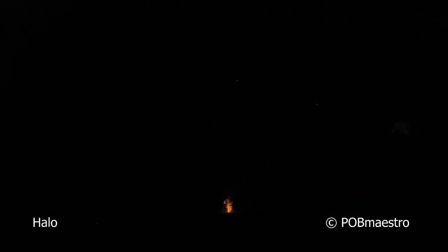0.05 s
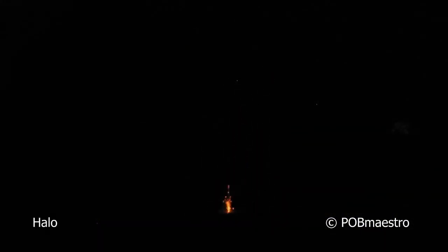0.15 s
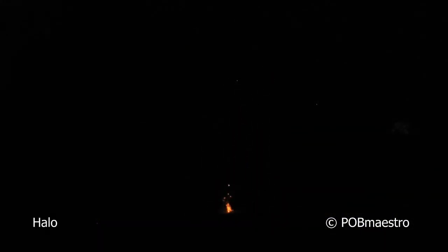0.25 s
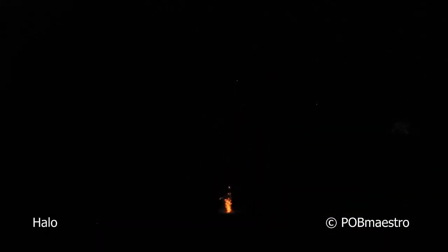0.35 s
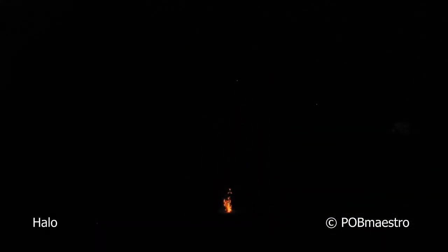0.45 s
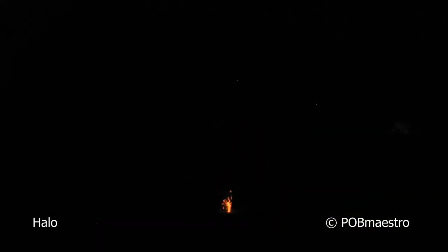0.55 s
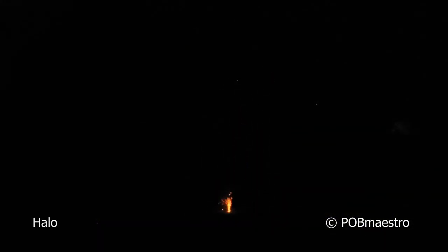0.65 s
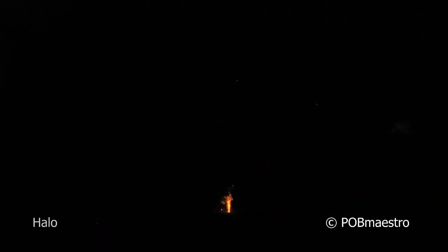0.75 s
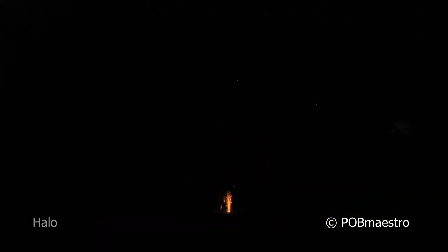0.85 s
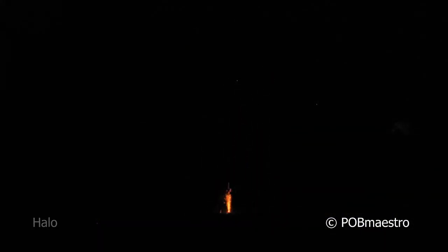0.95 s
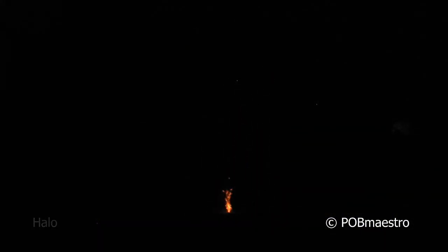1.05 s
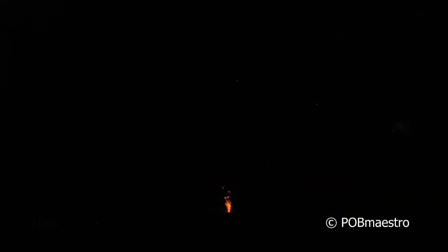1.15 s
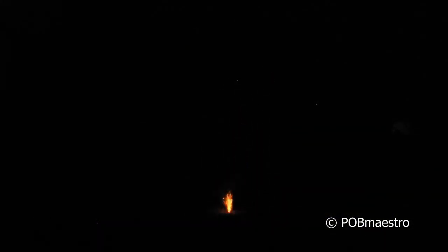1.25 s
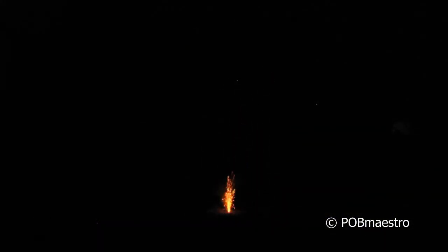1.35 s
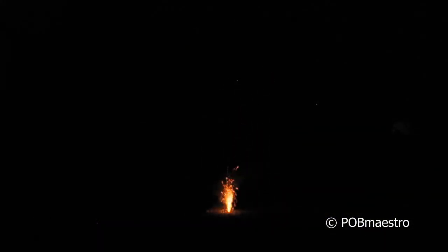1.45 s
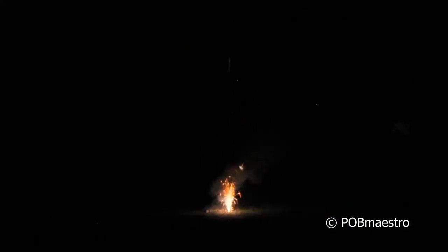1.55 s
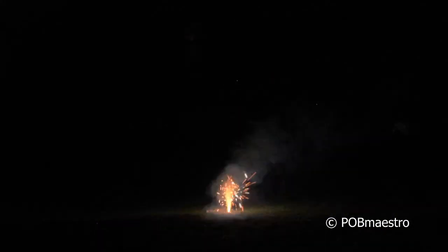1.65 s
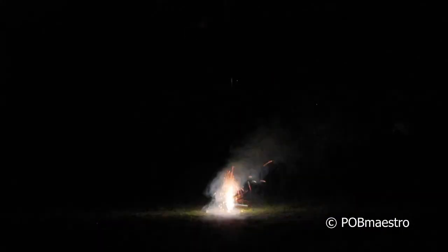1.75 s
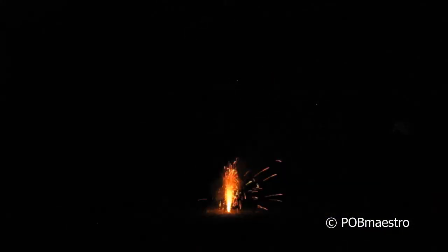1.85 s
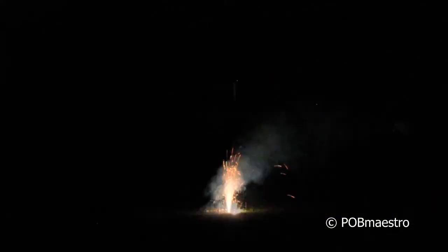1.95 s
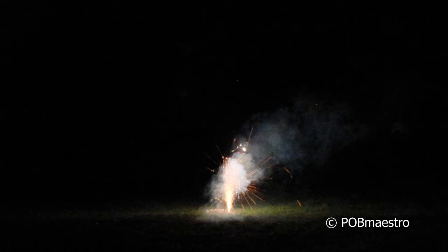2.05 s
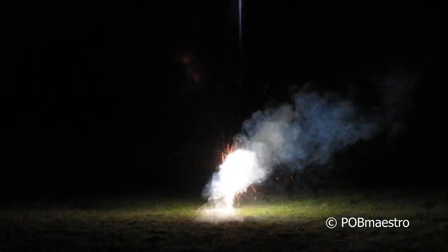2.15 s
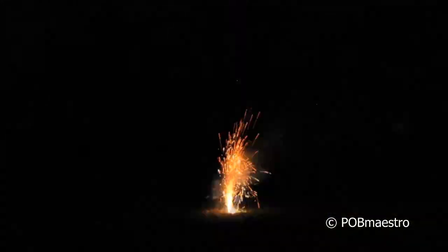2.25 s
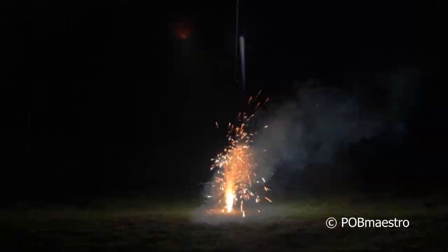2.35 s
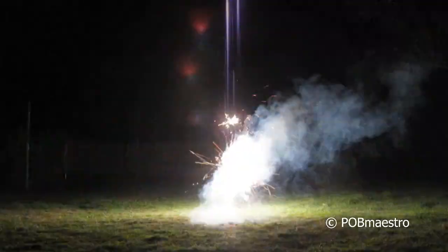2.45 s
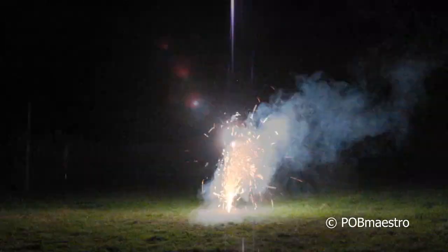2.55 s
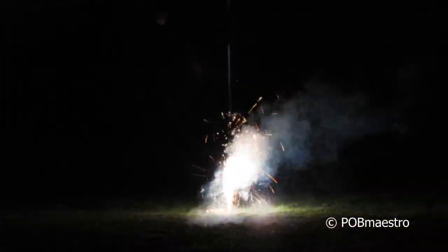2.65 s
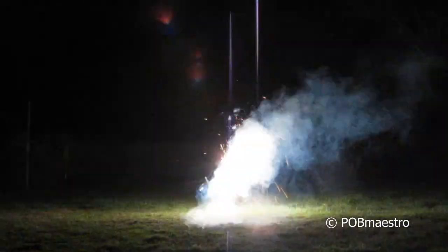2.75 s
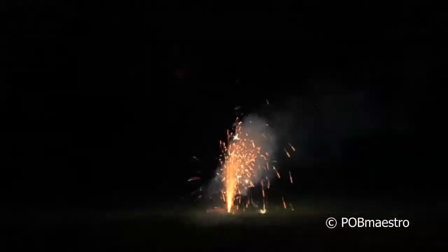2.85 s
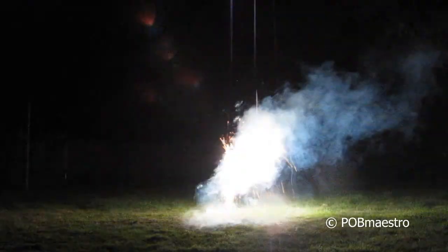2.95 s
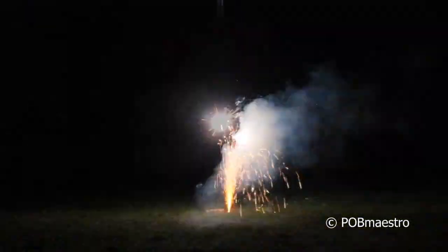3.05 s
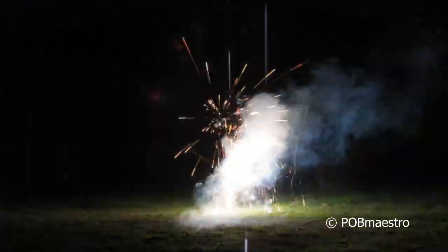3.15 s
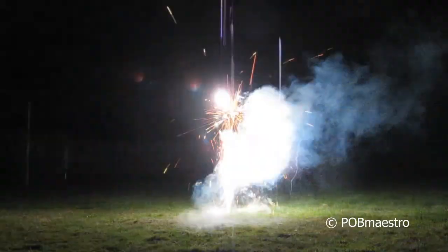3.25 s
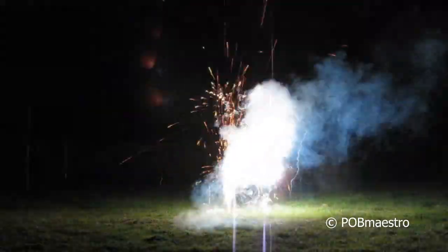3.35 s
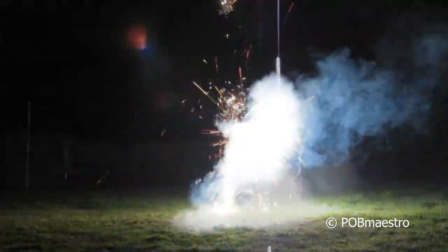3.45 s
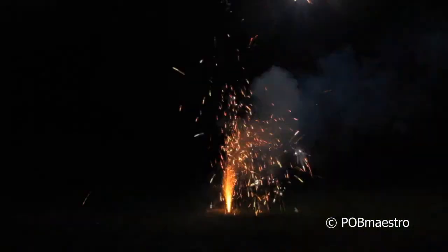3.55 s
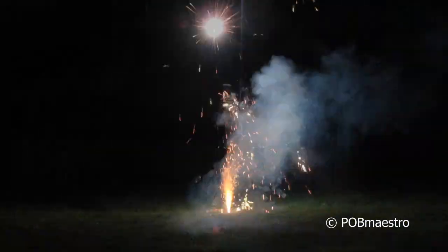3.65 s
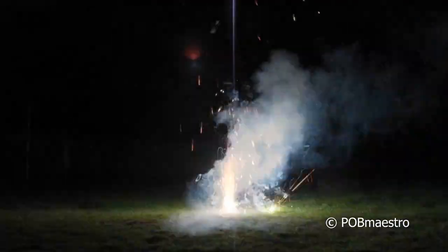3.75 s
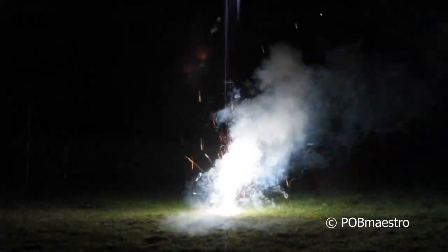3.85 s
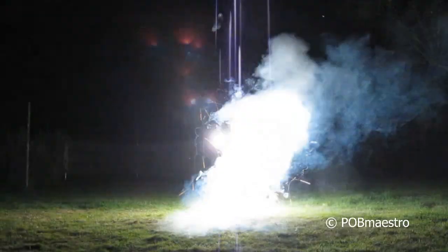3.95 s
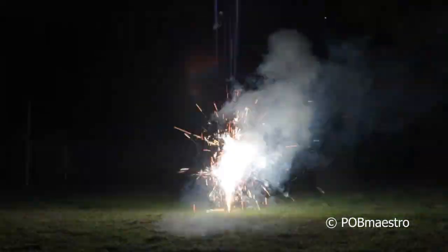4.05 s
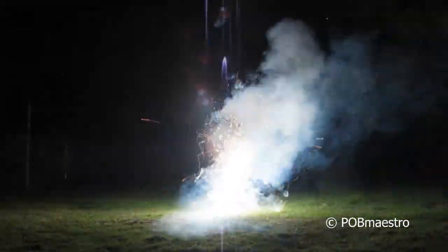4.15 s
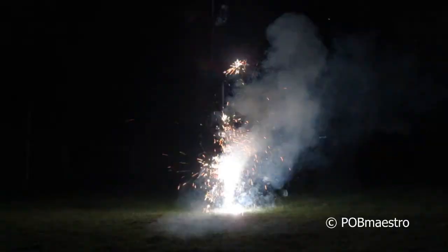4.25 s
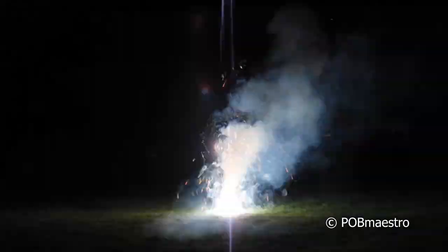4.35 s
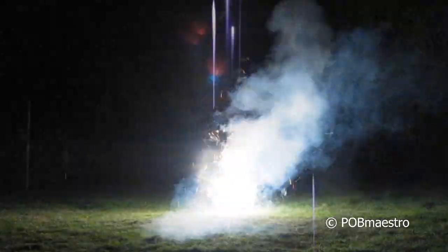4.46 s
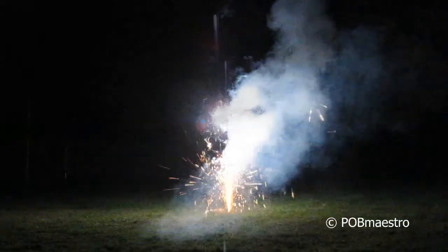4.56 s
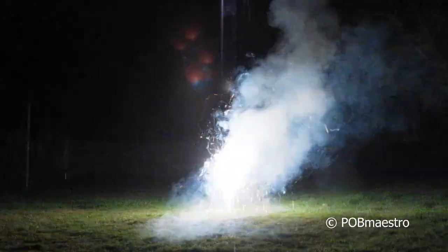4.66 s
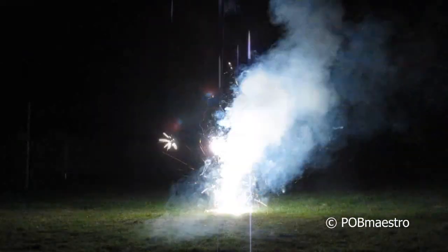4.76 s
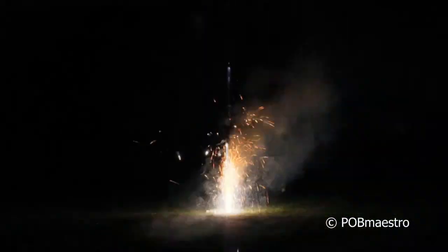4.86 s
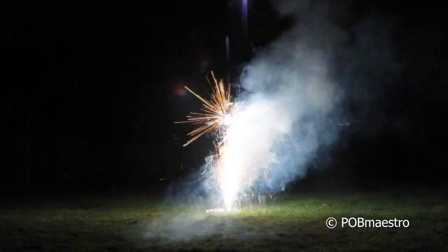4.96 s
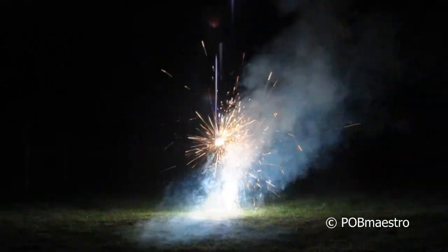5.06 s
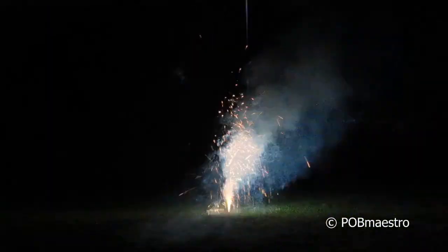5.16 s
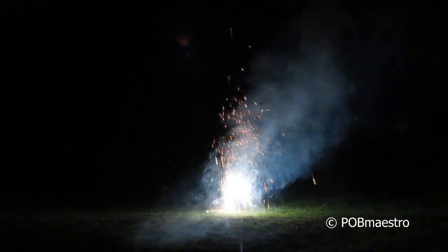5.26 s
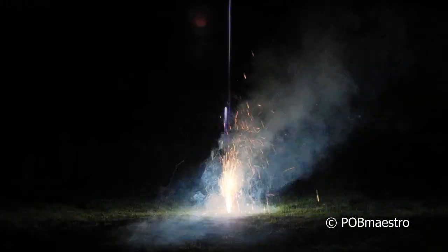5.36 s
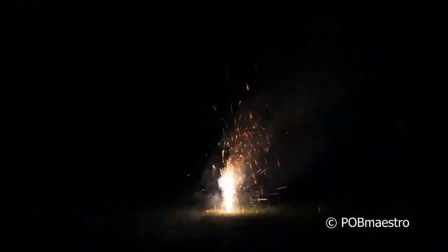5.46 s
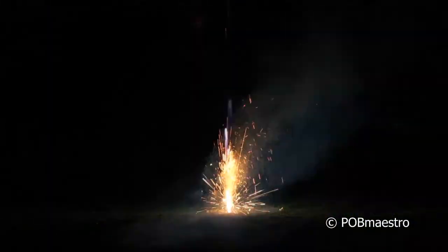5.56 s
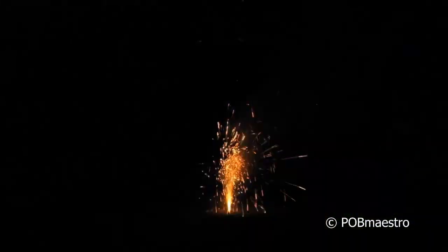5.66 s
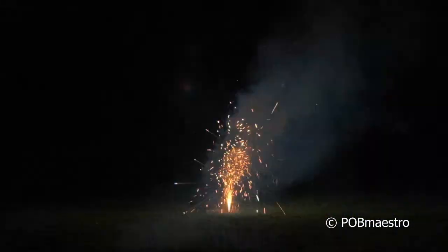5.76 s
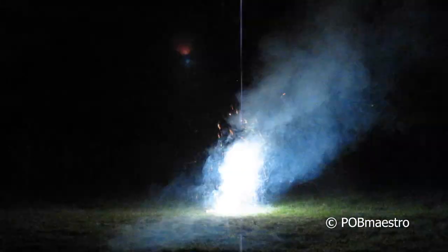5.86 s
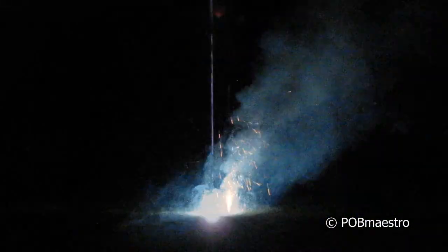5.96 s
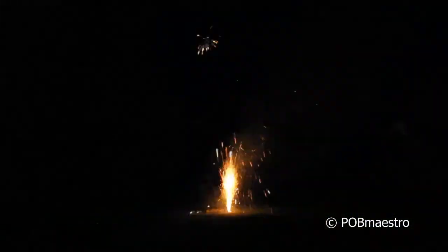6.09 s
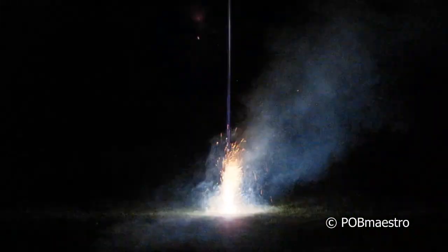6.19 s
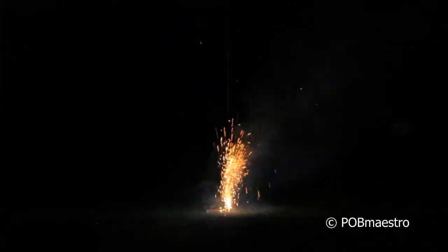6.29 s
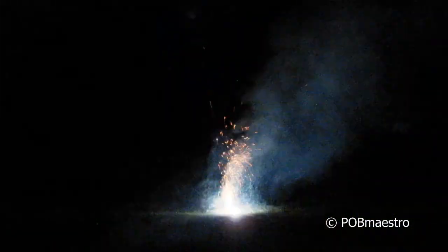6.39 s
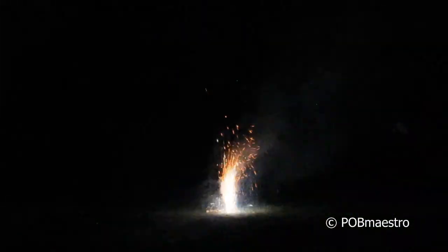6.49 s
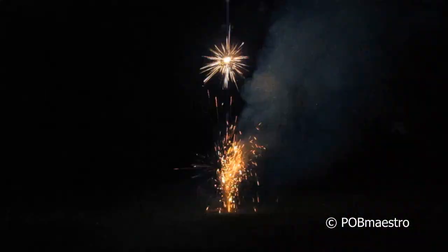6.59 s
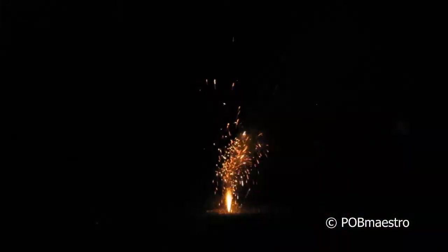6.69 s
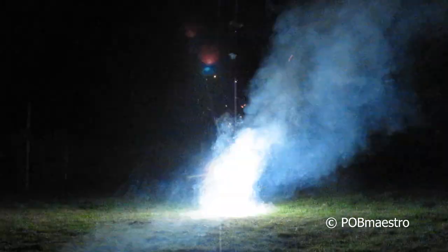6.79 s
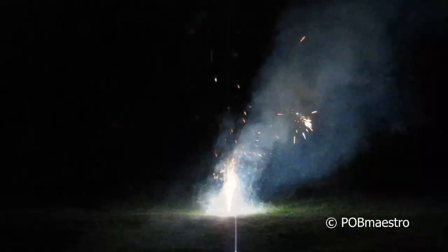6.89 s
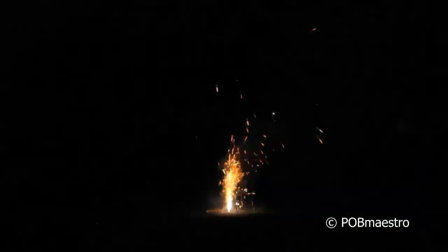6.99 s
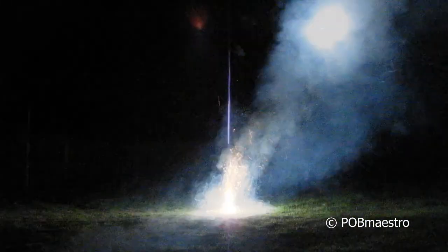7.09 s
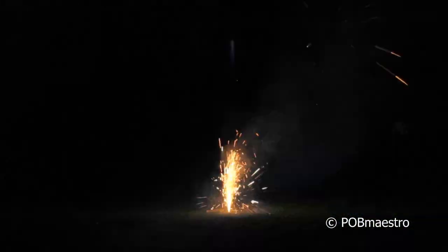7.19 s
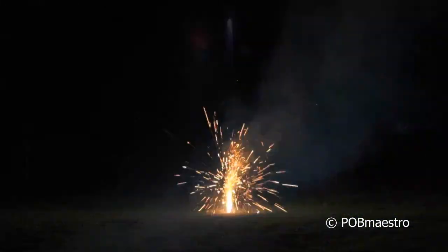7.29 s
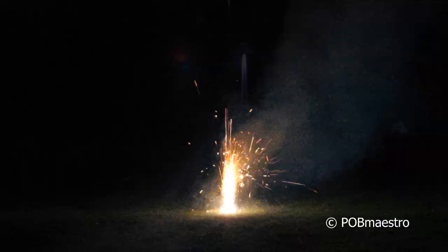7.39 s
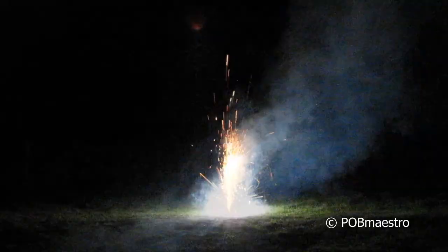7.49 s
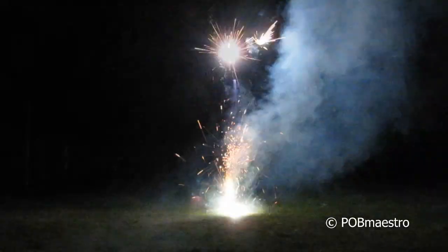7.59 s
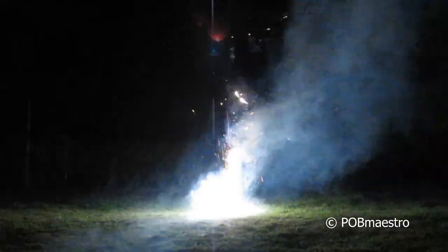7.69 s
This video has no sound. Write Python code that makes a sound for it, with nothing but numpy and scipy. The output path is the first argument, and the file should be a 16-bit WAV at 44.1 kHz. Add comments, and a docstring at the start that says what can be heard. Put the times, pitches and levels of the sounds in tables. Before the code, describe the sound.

Outdoors at night, a ground firework burns some metres from the microphone. From 0 to about 1.1 seconds its jet makes a bright, airy, sputtering hiss, slightly uneven, over soft low rumble of far traffic. At about 1.2 seconds the hiss chokes to a faint trace and the first weak ticks sound. From 1.6 seconds strong snaps arrive, with very hard cracks near 1.9, 2.1 and 2.2. Between 2.4 and 7.7 seconds dense irregular crackling continues, about twenty to thirty sharp dry cracks a second, varying in pitch and strength, slightly sparser around 6 to 6.6 and 6.8 to 7.2. Many carry short low thumps with a hollow knock, a wall slap ten milliseconds later, and a noisy echo swell fading within a few tenths. Tiny sparks tick in between. Heavy blasts near 2.46, 3.6, 3.8, 5.1 and 7.5 jam the microphone, momentarily muting and distorting it. Crackling is still going at the end.

```python
"""Crackling fountain firework

A ground fountain burns at night some metres from a microphone: first its jet hisses as coloured noise,
then stars burst as short shock fronts with low thumps, answered by a wall and a swell of noise echoes.
Random sparks tick after each star. After some blasts the preamp jams on its rail, mostly for some
milliseconds; steady noise of slowly changing level makes the rumble of far traffic."""
import sys
import numpy as np
from scipy import signal
from scipy.fft import rfft, irfft, next_fast_len
from scipy.io import wavfile
from scipy.ndimage import uniform_filter1d, map_coordinates

SR = 44100
rng = np.random.default_rng(int(sys.argv[2]) if len(sys.argv) > 2 else 0)


def volts_from_db(level):
    """Convert decibel levels to linear amplitude ratios."""
    exponent = np.asarray(level, float) / 20
    return 10 ** exponent


def unload_audio(sound):
    """Save the sound as a 16-bit wav file, at the path given as the first command line argument."""
    columns = np.transpose(np.atleast_2d(sound))
    # keep every value between -1 and 1, then stretch to whole-number steps
    steps = np.round(np.clip(columns, -1, 1) * 32767)
    wavfile.write(sys.argv[1], SR, steps.astype(np.int16))


N = 340893

# Star bursts, with levels and pitch as nominal values that the parts below offset.
# Each row: start in seconds, snap level in dB, snap pitch in Hz, thump level in dB, echo level in dB.
BURSTS = [(1.1952, -26, 7800, -54, -70), (1.3987, -26, 8040, -44, -47), (1.5563, -18.5, 8060, -44, -52),
          (1.5947, -12, 8150, -50, -43), (1.6382, 1, 5000, -21.5, -31), (1.6676, -15, 8400, -48, -42.5),
          (1.6975, -6.5, 5980, -23.5, -34), (1.7003, -2.5, 7800, -34, -36), (1.7473, 1, 5800, -22, -30.5),
          (1.7506, -3, 5460, -25, -38), (1.867, -10.5, 4760, -26, -38), (1.8874, 5, 6000, -12, -20.5),
          (1.914, -7, 6600, -45, -28), (2.004, -8.5, 6020, -50, -35), (2.065, 11, 8000, -18, -23),
          (2.0995, 4, 7600, -9.5, -12.5), (2.186, 13, 3850, -21, -21.5), (2.2146, 4, 8200, -29, -45),
          (2.2657, -1.5, 7140, -22, -26.5), (2.4, -4, 7100, -21.5, -28.5), (2.4335, 4.5, 8140, -30, -24.5),
          (2.4622, -7, 7140, -36, -15.5), (2.4635, -1, 4830, -12, -46), (2.539, 1, 6700, -20, -22),
          (2.556, 3, 5860, -28, -40), (2.5794, -4.5, 5070, -43, -28.5), (2.6555, -11.5, 5060, -49, -33),
          (2.7111, -6.5, 4740, -21, -29), (2.7325, -10, 6580, -33, -38), (2.7882, -14.5, 4080, -19.5, -40),
          (2.813, -5, 5800, -22, -28.5), (2.85, -2, 7250, -17, -18.5), (2.903, -4, 7360, -25, -32),
          (2.9077, 0.5, 7000, -29, -25.5), (3.0158, -3.5, 6400, -20.5, -21),
          (3.0861, -0.5, 7700, -18, -22.5), (3.1064, -1, 6940, -18, -14.5), (3.1165, 1, 8490, -16, -28),
          (3.137, -6.3, 7560, -26, -25), (3.2246, -10, 6200, -38, -29), (3.2382, 1, 6700, -15.5, -16.5),
          (3.2677, -3, 6400, -22.5, -26), (3.3552, -1.5, 4380, -54, -26.5), (3.366, -2, 6900, -25.5, -40),
          (3.3713, -5, 3730, -31, -29.5), (3.4005, -0.5, 8000, -15, -24), (3.4339, -4, 6790, -36, -24),
          (3.4636, -2, 6300, -16, -20.5), (3.525, -1.5, 7000, -29, -30), (3.5681, -4, 7640, -17, -17.5),
          (3.599, -15, 5010, -17, -22.5), (3.612, 4, 4930, -20, -20), (3.6295, -0.5, 6200, -37, -31),
          (3.7156, -7.5, 5510, -38, -28.5), (3.7981, -1.5, 6000, -12, -14.5), (3.8137, 3, 4170, -17, -21.5),
          (3.82, -7, 4130, -11.5, -20), (3.842, -14, 5700, -24, -19), (3.8701, -6, 7180, -14.5, -23),
          (3.9431, -3, 6540, -19.5, -25), (3.9536, -3, 8000, -34, -53), (3.979, -5.5, 7160, -23.5, -28),
          (4.0358, -2, 7300, -25, -26), (4.1283, -1.5, 5400, -27.5, -29), (4.1536, -1, 5100, -16, -17),
          (4.1819, -3, 4000, -36, -30.5), (4.2692, -6.5, 3700, -36, -22), (4.2768, 15, 6900, -17, -17),
          (4.2907, -1, 4110, -18.5, -23), (4.306, -2, 3590, -22.5, -38), (4.3941, -10, 3830, -41, -27),
          (4.4165, -16, 8400, -48, -42), (4.4493, 1, 7000, -15.5, -17), (4.5442, -0.5, 7000, -24.5, -30),
          (4.5589, -7.5, 4200, -22.5, -40), (4.5955, -1, 4930, -23, -25.5), (4.6618, 2, 7200, -25, -20),
          (4.6676, -1.5, 4220, -23.5, -48), (4.6903, -9, 7240, -41, -33), (4.7786, -8.5, 4520, -38, -33),
          (4.8255, -7.5, 7460, -25.5, -35), (4.8578, 1.5, 7490, -33, -29), (4.8598, -2.5, 6360, -22.5, -25),
          (4.8873, -5, 6290, -43, -38), (4.8942, -11, 7190, -23, -36), (4.9757, 0.5, 7350, -17.5, -23),
          (4.9989, 2, 7800, -17.5, -19.5), (5.0111, -4.5, 4910, -26, -36), (5.073, -1.5, 4160, -25, -23),
          (5.0822, 0, 7100, -32, -29), (5.0962, -5, 6720, -18, -17.5), (5.1255, -6, 4340, -40, -39),
          (5.1623, 7, 7300, -29, -19.5), (5.1705, -1, 6460, -20, -18.5), (5.1762, 4, 4630, -23, -31),
          (5.2292, 8, 6100, -21, -18), (5.2574, -7, 6200, -33, -28), (5.3194, -7.5, 5040, -22.5, -28),
          (5.3409, 9, 7260, -22.5, -19), (5.37, -3.5, 5400, -35, -34), (5.3994, -4, 7260, -18.5, -29),
          (5.4562, -11.5, 3940, -46, -31.5), (5.4814, -5.5, 7700, -19.5, -32),
          (5.504, 1, 7150, -21.5, -21.5), (5.5141, -5, 8400, -41, -25), (5.5278, 2, 6800, -28, -19.5),
          (5.5447, -3, 5380, -25, -26), (5.557, -5, 4050, -29, -38), (5.5894, -4, 8160, -20, -26),
          (5.646, -10.5, 4080, -28.5, -29), (5.6697, -2, 7100, -16.5, -22.5), (5.7179, 1, 6400, -22, -19),
          (5.728, -3, 7400, -36, -52), (5.7387, -4, 3150, -45, -45), (5.835, -19, 5960, -51, -20.5),
          (5.8431, 5, 6000, -13.5, -15), (5.8783, -6, 5370, -32, -42), (5.9557, -8, 3700, -21.5, -25),
          (5.9598, 0, 4500, -43, -43), (6.1004, -8.5, 7300, -20.5, -32), (6.1548, -3, 8160, -17, -28.5),
          (6.2582, -8, 7400, -22, -33.5), (6.2841, 0, 7450, -19, -27.5), (6.3561, -11, 6300, -24.5, -37),
          (6.4009, -22, 6510, -52, -47), (6.4869, 1, 8400, -18.5, -28), (6.5864, 2, 8700, -16, -26.5),
          (6.589, -5.5, 8100, -18, -30), (6.6689, -1, 6300, -17, -17), (6.698, 1, 4300, -21, -24),
          (6.7089, 1, 5670, -25, -25.5), (6.7649, -3, 6200, -14, -16.5), (6.8812, -10.5, 5200, -36, -31),
          (7.0173, -3, 5600, -16, -25), (7.056, -2.5, 6000, -19.5, -21), (7.1722, -13.5, 6500, -43, -38),
          (7.241, 5, 7530, -22, -23), (7.2421, -1, 4900, -25, -25.5), (7.2966, 0.5, 5950, -24.5, -26.5),
          (7.3677, 3, 3720, -17.5, -26), (7.374, -1, 3420, -27, -19.5), (7.3833, -2, 6150, -15, -18.5),
          (7.4126, -5, 5900, -28, -44), (7.4226, -5, 6870, -35, -44), (7.4842, -7, 4420, -48, -22.5),
          (7.4902, -1, 7350, -15, -22), (7.501, -2, 5060, -13.5, -18.5), (7.5301, -1, 5060, -23, -25),
          (7.6175, 3, 6000, -17, -24.5), (7.675, 3, 6300, -18, -22), (7.6912, -2, 6180, -11.5, -40),
          (7.7034, 0, 6400, -15.5, -15)]
# Spectrum of the bright part of the echoes. Each row: frequency in Hz, relative level in dB.
BRIGHT_ECHO_COLOUR = [(2500, -30), (4200, -5), (5500, -2.5), (8200, 4), (10000, -2.5), (12000, -12),
                      (16000, -17.5), (20000, -50)]
# Spectrum of the middle part of the echoes. Each row: frequency in Hz, relative level in dB.
MID_ECHO_COLOUR = [(700, -15.5), (1500, -5.5), (2500, -2), (3500, 0), (4500, -3.5), (6500, -10),
                   (10000, -46)]
TILT_DB_PER_OCTAVE, EVEN_HZ = 5.5, 6000  # higher snaps throw brighter echoes with less middle
BRIGHT_ECHO_DB, MID_ECHO_DB = -5.5, -9.5  # offsets from the listed echo level
MID_GROWS, EVEN_DB = 0.18, -23  # stronger bursts carry more middle: dB per dB of echo over the even one


def stars():
    """Superposition: each burst sums a snap, a thump and the bright and middle parts of its echoes."""
    s, snap_db, hz, thump_db, echo_db = np.transpose(BURSTS)
    cycles = 0.34 + 0.37 * (hz[:, None] / 8000) ** 3  # higher fronts last more cycles
    port_ring = 0.33 * rng.random(len(s))
    fronts = snaps(hz * 1.002, cycles, port_ring)
    snap = place(s, volts_from_db(snap_db + 2.5)[:, None] * fronts)

    tilt_db = TILT_DB_PER_OCTAVE * np.log2(hz / EVEN_HZ)
    bright_db = echo_db + tilt_db + BRIGHT_ECHO_DB
    mid_db = echo_db - tilt_db + MID_ECHO_DB + MID_GROWS * (echo_db - EVEN_DB)
    bright = echoes(s, bright_db, answer(), BRIGHT_ECHO_COLOUR, count=7, fade_db=0.01, grain_db=4.2)
    mid = echoes(s, mid_db, answer(), MID_ECHO_COLOUR, count=6, grain_db=5.2)
    return rounded(snap) + thumps(s, thump_db) + bright + mid


def snaps(hz, cycles, ring):
    """Impulsive radiation: shock fronts, falling first, excite the damped resonance of the microphone port."""
    t = np.arange(SR // 200) / SR - 1 / (8 * hz[:, None])
    front = -np.cos(2 * np.pi * hz[:, None] * t) * np.exp(-hz[:, None] * np.abs(t) / cycles)
    port = np.sin(2 * np.pi * 8300 * t) * np.exp(-np.abs(t) / .0004) * (t > 0)
    return front + ring[:, None] * port


def rounded(x):
    """Band-pass filtering: the fronts lose their top above about 10 kHz; their bass is in the thump."""
    return signal.sosfilt(signal.butter(N=2, Wn=[1500, 10500], btype="band", fs=SR, output="sos"), x)


# Modes of something hollow nearby, struck by each thump.
# Each row: frequency in Hz, level relative to the thump in dB, 60 dB decay time in seconds.
HOLLOW = [(382.7, -20.5, 0.22), (641, -35, 0.17), (888, -31, 0.25)]
# Outline of the low echoes, before any added fade. Each row: delay in milliseconds, relative level in dB.
LOW_ECHO = [(1, -5), (9.5, -7), (11.5, -2.5), (25, -3), (32, -4), (60, -14), (150, -26), (400, -27)]
# Spectrum of the dull tail. Each row: frequency in Hz, relative level in dB.
BOOM_COLOUR = [(30, -8), (150, -2.5), (350, -1.5), (600, -11), (1500, -45)]
# Spectrum of the knock. Each row: frequency in Hz, relative level in dB.
KNOCK_COLOUR = [(250, -50), (550, 8.5), (1100, -0.5), (2500, -41)]


def thumps(s, db):
    """Impulse and modal response: a low push, a hollow ring, a dull tail and a knock that dies sooner."""
    u = np.arange(SR // 200) / SR / 0.00045  # time in units of 0.45 ms
    pulse = (u - 1.3) * np.exp(-u) * (1 - np.exp(-(u / 0.37) ** 2)) * 4  # a pull, then a weaker push
    push = place(s, volts_from_db(db)[:, None] * pulse)

    t = np.arange(SR // 4) / SR
    modes = sum(volts_from_db(level - 60 * t / t60) * np.sin(2 * np.pi * hz * t) for hz, level, t60 in HOLLOW)
    strikes = place(s, volts_from_db(db)[:, None])
    ring = signal.fftconvolve(strikes, modes)[:N]

    tail = echoes(s, db - 17, LOW_ECHO, BOOM_COLOUR, count=3)
    knock = echoes(s, db - 13.0, LOW_ECHO, KNOCK_COLOUR, count=3, fade_db=0.46)
    return off_wall(push, -5.5) + ring + tail + knock


WALL_MS = 10.5  # extra delay by way of the nearest wall


def off_wall(x, db):
    """Specular reflection: a sound and its delayed copy off the nearest wall."""
    return x + volts_from_db(db) * np.pad(x, (round(WALL_MS * SR / 1000), 0))[:N]


def echoes(s, level_db, shape, colour, count, fade_db=0, grain_db=0):
    """Convolution: bursts take turns among scattered answers of one outline, as from different places."""
    ms, db = np.transpose(shape)
    t = np.arange(int(.4 * SR)) / SR * 1000  # ms
    outline = volts_from_db(np.interp(t, ms, db, left=-99) - fade_db * t)  # fade in dB per ms
    which = np.arange(len(s)) % count
    total = 0
    for k in range(count):
        blows = place(s[which == k], volts_from_db(level_db[which == k])[:, None])
        response = outline * aired(noise(colour, len(t), grain_db), t)
        total = total + signal.fftconvolve(blows, response)[:N]
    return total


GROUND_DB, GROUND_DB_PER_MS, GAP_DB = 9.5, 6, -17.5  # ground nearby answers at once, then near silence
SLAP_DB, SLAP_DB_PER_MS = 10, 16.5  # the wall's slap
SWELL_DB, SWELL_MS, SWELL_RISE_MS, SWELL_FALL_MS = -0.5, 21.2, 2.9, 9.6  # a crowd of scattered echoes
TAIL_DB, TAIL_DB_PER_MS, TAIL_BEND_MS = -6, 0.095, 310  # the far tail, falling away faster near the bend


def answer():
    """Energy addition: ground, gap, slap, swell and tail add in power to an outline of (ms, dB) rows."""
    ms = np.arange(1, 400, .1)
    late = np.maximum(ms - WALL_MS, 0)
    ground = volts_from_db(GROUND_DB - GROUND_DB_PER_MS * ms) ** 2
    gap = volts_from_db(GAP_DB) ** 2 * (late == 0)
    slap = volts_from_db(SLAP_DB - SLAP_DB_PER_MS * late) ** 2
    swell_width = np.where(ms < SWELL_MS, SWELL_RISE_MS, SWELL_FALL_MS)
    swell = volts_from_db(SWELL_DB) ** 2 * np.exp(-((ms - SWELL_MS) / swell_width) ** 2)
    tail = volts_from_db(TAIL_DB - TAIL_DB_PER_MS * late - 8.8 * (ms / TAIL_BEND_MS) ** 6) ** 2
    power = ground + gap + (slap + swell + tail) * (late > 0)
    return np.transpose([ms, 10 * np.log10(power)])


AIR_HZ, AIR_DB_PER_MS = 10300, 0.09  # the longer the path, the more air takes from the top


def aired(tail, ms):
    """Atmospheric absorption: the top of an echo tail dies faster than its body."""
    body = signal.sosfiltfilt(signal.butter(N=4, Wn=AIR_HZ, fs=SR, output="sos"), tail)
    return body + (tail - body) * volts_from_db(-AIR_DB_PER_MS * ms)


SPARK_LAG_S, SPARK_DB_PER_S = 0.05, 80  # scale of the random delay, weakening with delay


def sparks(count):
    """Random point process: each burst scatters small sparks that tick at random soon after it."""
    s, *_, echo_db = np.transpose(BURSTS)
    luck = rng.random((len(s), count, 4))  # delay, size, pitch, port ring
    lag = WALL_MS / 1000 - SPARK_LAG_S * np.log(luck[..., 0] + .01)
    size_db = echo_db[:, None] - SPARK_DB_PER_S * lag - 2.9 * np.log(luck[..., 1] + 0.002)
    ticks = snaps(2200 + 5000 * luck[..., 2].ravel(), 1.0, 0.14 * luck[..., 3].ravel())
    starts = (s[:, None] + lag).ravel()
    return rounded(place(starts, volts_from_db(size_db.ravel())[:, None] * ticks))


# The jet's mean level: strong until it chokes near 1.2 s, sinking with a brief recovery to a faint hiss,
# slightly up at the end. Each row: time in seconds, level in dB.
JET = [(0, -44.5), (.07, -41.5), (.25, -44), (.43, -39.5), (.69, -41), (.87, -38.5), (1.122, -42),
       (1.16, -49), (1.3, -57.5), (1.55, -52.5), (2.4, -61), (4.0, -80), (7.73, -70)]
# Spectrum of the roar. Each row: frequency in Hz, relative level in dB per Hz.
JET_COLOUR = [(1350, -52), (2300, -31), (3340, -14.5), (3960, -21), (4970, -10), (6450, -10.5),
              (7460, -3.5), (11300, -17), (15000, -40), (16000, -29)]
# Spectrum of the fizz on top. Each row: frequency in Hz, relative level in dB per Hz.
FIZZ_COLOUR = [(8000, -22), (10500, 2), (14000, -6), (17000, 1)]


def jet():
    """Turbulent jet noise: burning gas roars and sputters; the harder it blows, the more it fizzes on top."""
    level_db = curve(JET)
    roar_db = level_db + 1.17 * wobble(29.9) + 0.63 * wobble(250)
    fizz_db = -58.5 + 2.3 * (level_db + 44) + 1.6 * wobble(9.2)
    return volts_from_db(roar_db) * noise(JET_COLOUR, N) + volts_from_db(fizz_db) * noise(FIZZ_COLOUR, N)


# The rumble's mean level: nearly steady, up a little near 1.8 s, low by 2.5 s, then slowly rising.
# Each row: time in seconds, level in dB.
TRAFFIC = [(0, -41.5), (1.55, -42.5), (1.8, -40), (2.05, -48), (2.5, -56.5), (7.73, -49)]
# Spectrum of the traffic. Each row: frequency in Hz, relative level in dB per Hz.
TRAFFIC_COLOUR = [(20, -3.5), (60, -8), (110, -12.5), (250, -19), (500, -27), (1100, -26.5), (2300, -36.5),
                  (16000, -45)]


def traffic():
    """Incoherent background: the far rumble of the night as low-weighted noise of wavering level."""
    return volts_from_db(curve(TRAFFIC) + 0.29 * wobble(3.42)) * noise(TRAFFIC_COLOUR, N)


def unit(x):
    """Normalisation: scales a signal to rms 1."""
    return x / np.sqrt(np.mean(x ** 2) + 1e-20)


def curve(rows):
    """Linear interpolation: (s, value) rows become one value per sample."""
    s, v = np.transpose(rows)
    return np.interp(np.arange(N) / SR, s, v)


def wobble(rate):
    """Slow random modulation: a smooth curve through rate random knots a second."""
    knots = rng.standard_normal(int(N * rate / SR) + 4)
    return map_coordinates(knots, [np.arange(N) * rate / SR])


def noise(spectrum, size, grain_db=0):
    """Spectral shaping: noise of rms 1 coloured by (Hz, dB) points; grain makes some instants stand out."""
    m = next_fast_len(size)
    f, db = np.transpose(spectrum)
    bins = np.fft.rfftfreq(m, 1 / SR)
    gain = volts_from_db(np.interp(np.log(bins + 1), np.log(f + 1), db))
    lumps = volts_from_db(grain_db * unit(uniform_filter1d(rng.standard_normal(m), size=7)))
    white = rng.standard_normal(m) * lumps
    return unit(irfft(rfft(white) * gain, m)[:size])


def place(s, waves):
    """Linear superposition: sums rows of short waves at their start times."""
    at = np.round(s * SR).astype(int)[:, None] + np.arange(waves.shape[1])
    return np.bincount(at.ravel(), waves.ravel(), N + SR)[:N]


def scene():
    """Superposition of sources: everything in the air at the microphone."""
    return (stars() + sparks(count=6) + jet() + traffic())[None]


# Preamp jams, each begun just after the nearest burst.
# Each row: approximate start in seconds, hold on the rail in milliseconds.
JAMS = [(2.4638, 16), (3.107, 0.73), (3.2384, 12), (3.5995, 25.5), (3.7986, 20.2), (3.842, 3.5),
        (4.1538, 9.5), (4.277, 0.23), (5.0962, 16.3), (5.1621, 0.28), (5.2295, 0.22), (5.5284, 2.8),
        (5.8436, 1.9), (6.6694, 8), (7.3842, 12.8), (7.5013, 26.4)]
RAIL_DB, RAIL_DB_PER_DOUBLING = -10.5, 1.35  # swing to the rail for a 1 ms jam; longer jams swing deeper
SWING_DB, NARROW_SWING_DB, NARROWS_S = 6, -4, 2.24  # highest downward swing; it narrows at this time
UPWARD_DB = -3  # upward swings clip sooner


def jammed(x):
    """Bias shift and clipping: a blast drives the bias below the rail; peaks return first as it creeps home."""
    y, t = x.copy(), np.arange(SR // 8) / SR
    starts = np.array(BURSTS)[:, 0]
    for s, hold_ms in JAMS:
        nearest = starts[np.argmin(np.abs(starts - s))]
        i = round((nearest + .0003) * SR)
        rail = volts_from_db(RAIL_DB + RAIL_DB_PER_DOUBLING * np.log2(hold_ms))
        hold = hold_ms / 1000
        sag = (rail + 0.0083) * np.exp((hold - t) / (0.0037 + .5 * hold))
        y[i:i + len(t)] = np.maximum(y[i:i + len(t)] - sag[:N - i], -rail)
    swing = volts_from_db(np.where(np.arange(N) / SR < NARROWS_S, SWING_DB, NARROW_SWING_DB))
    return np.clip(y, -swing, swing * volts_from_db(UPWARD_DB))


def roll_off(x):
    """The treble ends steeply here."""
    return signal.sosfilt(signal.butter(12, 16410, fs=SR, output="sos"), x)


def record(dry):
    """Signal chain: jamming preamp, coupling capacitor, hiss, treble roll-off, band limit, full-scale clip."""
    keep = np.exp(-1 / (0.00093 * SR))  # the capacitor's time constant is 0.93 ms
    x = signal.lfilter([1, -1], [1, -keep], jammed(dry[0]))
    x = x + volts_from_db(-68) * rng.standard_normal(N)  # the converter's own hiss, before the filters
    x = signal.lfilter(*signal.butter(N=2, Wn=12500, fs=SR), x)  # the top rolls off gently above about 12.5 kHz
    x = signal.sosfiltfilt(signal.butter(N=14, Wn=15850, fs=SR, output="sos"), x)  # band limit
    return roll_off(np.clip(x, -1, 1)[None])


dry = scene()
out = record(dry)
unload_audio(out)
```